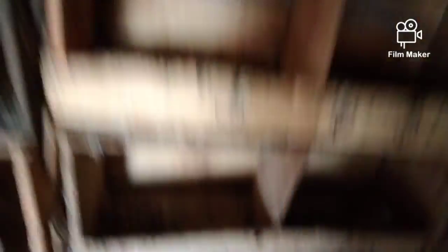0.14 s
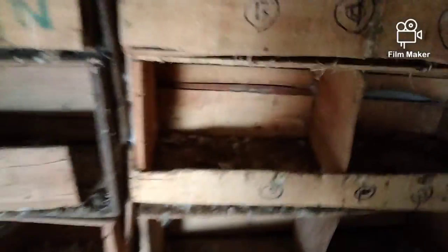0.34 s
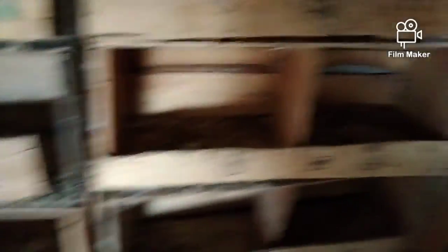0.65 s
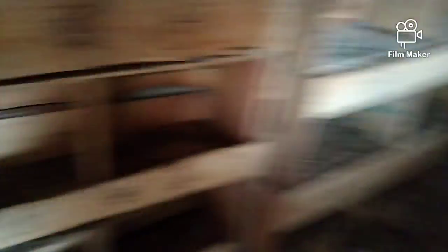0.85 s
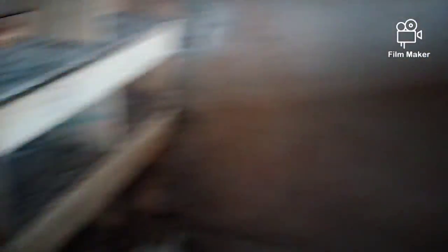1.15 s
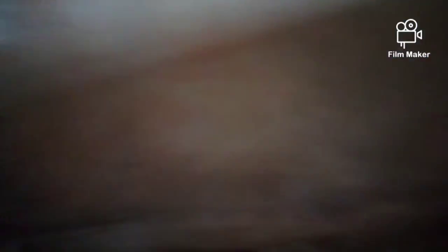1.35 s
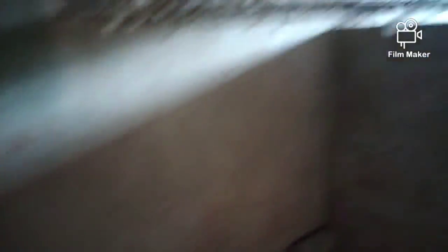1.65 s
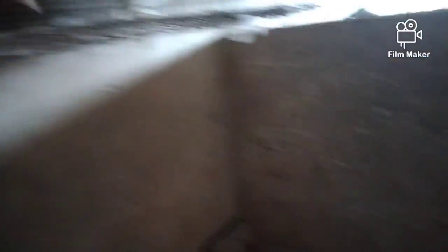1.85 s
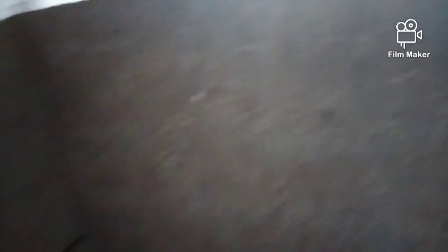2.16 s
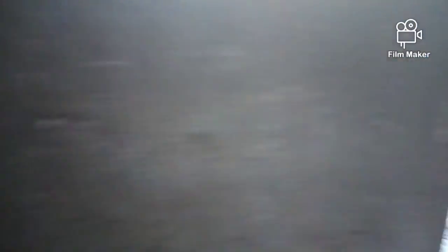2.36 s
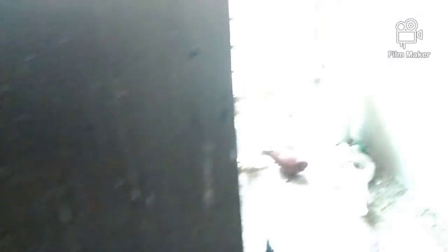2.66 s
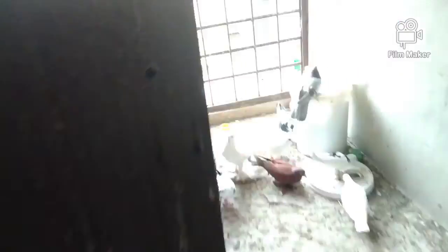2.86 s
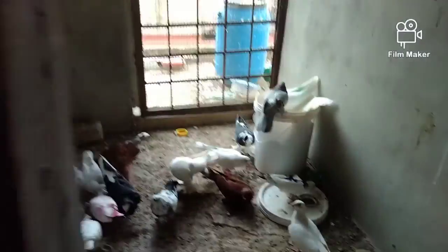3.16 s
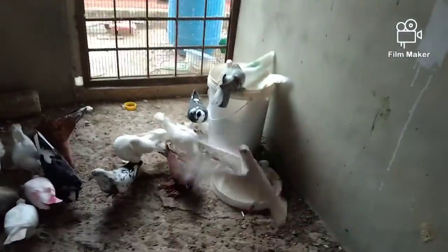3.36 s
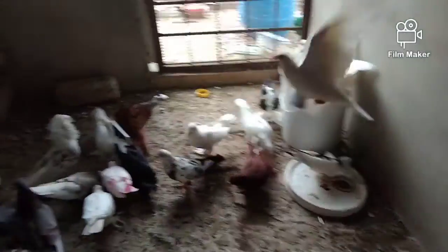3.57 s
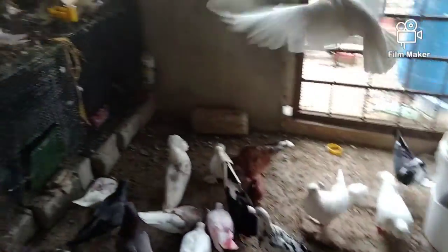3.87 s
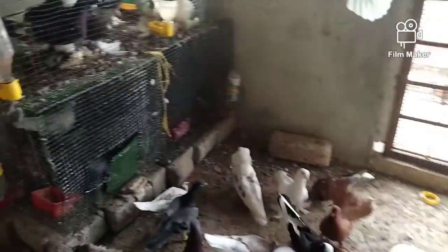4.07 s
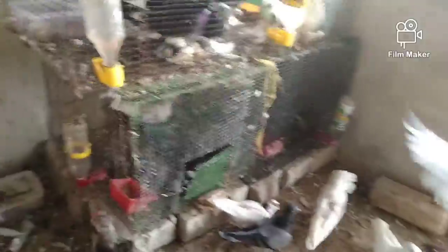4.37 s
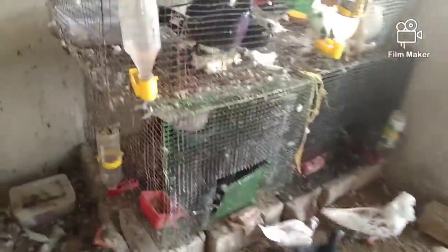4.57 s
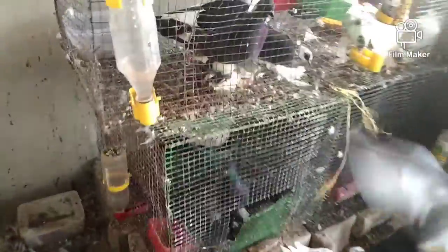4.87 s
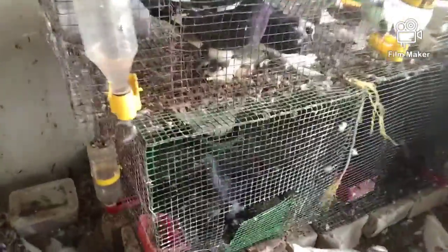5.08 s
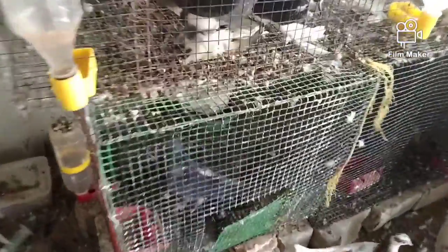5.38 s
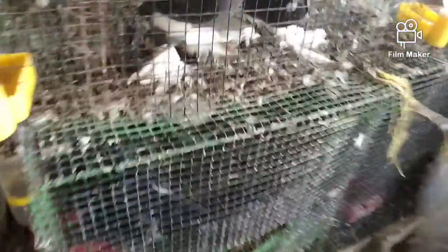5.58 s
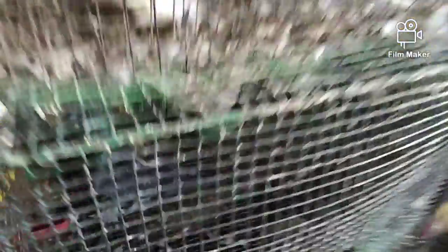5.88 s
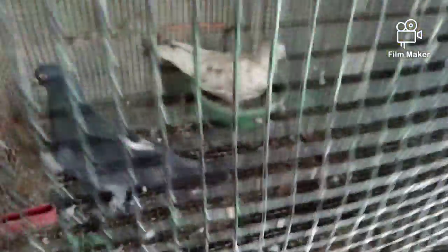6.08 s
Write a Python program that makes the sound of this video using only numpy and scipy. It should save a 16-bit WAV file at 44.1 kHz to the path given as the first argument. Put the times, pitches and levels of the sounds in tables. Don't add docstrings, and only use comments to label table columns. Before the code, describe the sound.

Quiet, muffled wing flutter comes first, with squeaky young-bird calls about a second in, a scuff of grit and a few falling whistles, plus a barely heard coo. Then the sound suddenly turns near and full: pigeons flapping hard, snapping feathers, swishing air, soft booms and dry rustling in a small concrete room. The phone's noise suppression thins the quiet parts over a faint pulsing hum.

```python
import sys
import numpy as np
from scipy import signal
from scipy.io import wavfile
from scipy.ndimage import uniform_filter1d

SR = 44100
rng = np.random.default_rng(int(sys.argv[2]) if len(sys.argv) > 2 else 0)


def wav_out(sig):
    wavfile.write(sys.argv[1], SR, np.round(np.clip(np.atleast_2d(sig).T, -1, 1) * 32767).astype(np.int16))


def decibels_to_gain(level_db):
    exponent = np.asarray(level_db, float) / 20
    return 10 ** exponent


N = 275184
CONTROL_STEP = 32
CORNER_S = 3.385

# t/s, effort level/dB, heft (0 far and thin, 1 near and full)
FLOCK = [(0, -73.5, 0.48), (.4, -71, -0.43), (.75, -67, 0.13), (1.2, -67, -0.97), (1.45, -58.5, 0.11),
         (1.72, -67, -0.6), (2.1, -59, -0.13), (2.501, -61.5, -0.098), (2.9, -65.5, -0.31),
         (3.37, -65, -0.19), (3.392, -45.5, 0.84), (3.65, -50, 0.77), (4.0, -52, 0.98), (4.2, -48.5, 0.61),
         (4.56, -47.5, 1.13), (4.8, -43, 1.01), (5.5, -43.5, 1.03), (6.24, -47.5, 1.05)]
# peak t/s, peak level/dB, heft
GUSTS = [(.54, -57.5, -.2), (1.35, -56, -0.77), (1.97, -49, 0.18), (2.05, -58, 0.38), (2.2, -46.5, 0.92),
         (2.309, -47, 0.98), (3.41, -50, .3), (3.56, -45.5, .9), (3.82, -49, 0.93), (4.24, -44, 0.93),
         (4.302, -44.5, 1.22), (4.44, -39.5, 1.08), (4.63, -40.5, 0.59), (4.86, -42, 1.14),
         (4.97, -48, 1.36), (5.3, -61, 0.47), (5.57, -41, 1.3), (5.728, -36.5, 1.24), (5.89, -41, 1.22),
         (6.001, -42, 1.12), (6.13, -45, 1)]
GUST_RISE_DB_S, GUST_FALL_DB_S = 250, 133
# level against effort/dB, loss when heft falls to 0/dB
LAYER_DB, THIN_DB = [-8.5, -2.6, 0.4, 0.2, 0.0], [17, 37.5, 14, 2.5, -1.5]
WALL_DB = [-32, -20, -3.5, 0.5, .5]


def wing_levels():
    now = control_time()
    s, db, heft = np.transpose(FLOCK)
    gust_s, gust_db, gust_heft = np.transpose(GUSTS)
    gusts = peaked(gust_s, gust_db, GUST_RISE_DB_S, GUST_FALL_DB_S)
    effort = np.vstack([np.interp(now, s, db), gusts])
    thin = 1 - np.vstack([np.interp(now, s, heft), gust_heft[:, None] + 0 * now])
    levels = []
    for offset_db, loss_db, wall_db in zip(LAYER_DB, THIN_DB, WALL_DB):
        levels.append(total_db(effort + offset_db - loss_db * thin) + wall_db * behind_wall())
    return levels


# f/Hz, density level/dB per Hz
WASH_COLOUR = [(76, -36), (130, -10), (153, -1.5), (246, -1), (503, -2.5), (672, -3), (939, -9.5),
               (1410, 0.5), (1760, -4.5), (2420, -3), (3140, 1.5), (4200, -13.5), (5460, -45), (9240, -120)]


def wash(beat):
    return airy(wing_levels()[1:], [135, 330, 950, 2200, 4100], WASH_COLOUR, beat, count=6,
                patchy_db=4.5, quiet_db=-52.5, lump_db=2.0, lump_hz=44)


# t/s, peak level/dB, centre f/Hz, snap level/dB
CLAPS = [(0.475, -43.5, 1330, -4), (1.962, -40, 2940, -17), (1.9893, -36, 2900, -15),
         (2.1759, -33, 1490, 1), (2.196, -30, 2930, -4.5), (2.309, -34.5, 3300, -16),
         (3.2178, -34, 1140, -8), (3.3911, -42, 1430, 6), (1.945, -41, 2600, -12), (3.5061, -33, 1430, -6),
         (3.8109, -32, 1950, -8), (3.8832, -33, 3320, 2), (4.6904, -26, 3250, -15), (4.9882, -28, 2400, -4),
         (5.2232, -28, 1640, -8), (5.6951, -23, 2990, -2), (5.7211, -22, 3030, -4), (6.1331, -25, 2280, 6),
         (3.5436, -10.5, 2700, -6.5), (3.6892, -31, 2030, -12), (3.7655, -32.5, 1480, 5),
         (3.908, -29, 3400, 0), (4.3144, -22, 3050, 2.5), (4.41, -26.5, 3250, -6), (4.4401, -15, 1630, -4),
         (4.572, -19, 2830, -3), (4.605, -17.5, 1410, -0.5), (4.7122, -22.5, 3270, 7.5),
         (4.738, -22.5, 1670, -4), (4.8668, -16.5, 2560, 4), (5.1039, -19, 1440, -5),
         (5.3504, -28, 3140, -10), (5.4311, -18.5, 2100, -22), (5.5528, -9, 3340, -1),
         (5.6128, -15.5, 1380, 3), (5.661, -21, 1437, 2.5), (5.7758, -9.5, 1890, -4),
         (5.8188, -17.5, 1330, -1), (6.028, -22, 1400, 8), (6.1084, -29, 3250, 8)]


def claps():
    out, t = np.zeros(N + SR), np.arange(SR // 4) / SR
    crack = t / .0014 * np.exp(1 - t / 0.0011)
    tail_shape = 0.19 * np.minimum(t / 0.0042, 1) * decibels_to_gain(-60 * t / 0.14)
    for s, peak_db, hz, snap_db in CLAPS:
        air, other = rng.standard_normal((2, len(t)))
        snap = band(air, 1230, 1550) + band(air, 2600, 3630) + band(other, 6580, 7540)
        snap += 0.32 * band(other, 10600, 16600) + 0.036 * band(other, 5200, 5700, order=1)
        push = band(other, 186, 1060) * np.minimum(t / 0.0068, 1) * np.exp(-t / 0.055)
        body = band(air, hz / 1.94, hz * 1.53)
        noise = body / body.std() + decibels_to_gain(snap_db) * snap / snap.std()
        hit = crack * noise / np.abs(crack * noise).max()
        hit += tail_shape * noise + decibels_to_gain(-16.0 + snap_db) * push / push.max()
        i = round(s * SR)
        out[i:i + len(t)] += decibels_to_gain(peak_db) * hit
    return out[:N]


# t/s, peak level/dB, f/Hz
THUMPS = [(4.294, -28, 258), (4.36, -28, 248), (4.532, -31, 231), (4.604, -26, 231), (4.845, -26, 423),
          (5.38, -30, 665), (5.483, -29, 183), (5.658, -28, 304), (5.714, -21, 210), (5.764, -22, 296),
          (5.878, -23, 315), (5.963, -27, 659), (6.118, -30, 312)]
THUMP_DB, THUMP_T60_S = -9.5, .17


def thumps():
    out, t = np.zeros(N + SR), np.arange(SR // 4) / SR
    shape = np.minimum(t / .006, 1) * decibels_to_gain(-60 * t / THUMP_T60_S)
    for s, db, hz in THUMPS:
        puff = band(rng.standard_normal(len(t)), hz / 1.3, hz * 1.3)
        i = round(s * SR)
        out[i:i + len(t)] += decibels_to_gain(db + THUMP_DB) * puff / puff.std() * shape
    return out[:N]


def boom_level():
    drone_db = -57.5 + WALL_DB[0] * behind_wall()
    return total_db(np.vstack([wing_levels()[0], drone_db]))


def boom():
    white = rng.standard_normal((2, N))
    ringing, skirt = band(white[0], 83.6, 118.0), band(white[1], 44, 110)
    x = ringing / ringing.std() + .5 * skirt / skirt.std()
    return x * decibels_to_gain(full(boom_level()))


# t/s, level/dB, settling/dB per s, mellowness/dB
STIRS = [(0, -52, 64, -3), (.15, -53.5, 57, -1.5), (0.428, -51.5, 51, -2.5), (.78, -53.5, 32, -2),
         (1.08, -51.5, 22, -5.5), (1.14, -46.5, 128, -3.5), (1.3, -57.5, 6, 2), (1.62, -58.5, 45, -4),
         (1.77, -65.5, 113, 6), (1.97, -59.5, 11, 3.5), (2.031, -55.5, 76, 0.5), (2.179, -51.5, 53, 6),
         (2.41, -58.5, 84, 3), (2.62, -60, 7, 1), (2.82, -55.5, 25, -9), (3.07, -54.5, 35, -6),
         (3.27, -47.5, 96, -10), (3.39, -50, 5, 3.5), (3.55, -47.5, 13, 1.5), (3.88, -50.5, 4, 1.5),
         (4.12, -46.5, 6, -0.5), (4.31, -39, 55, -2.5), (4.44, -42, 85, 3.5), (4.58, -41, 13, -0.5),
         (4.72, -41.5, 21, 2.5), (4.87, -40.5, 18, -0.5), (5.12, -40.5, 3, -0.5), (5.55, -36.5, 28, 2.5),
         (5.78, -39, 60, 1.5), (5.94, -38.5, 8, 0.5)]
STIR_RISE_DB_S = 693
# level at a -45 dB stir/dB, share of its swing followed, share of mellowness
RUSTLE_DB, RUSTLE_FOLLOWS, RUSTLE_MELLOW = [-57.5, -50, -45], [1.084, 0.93, 1.026], [1.36, 0.3, -0.36]
RUSTLE_FLOOR_DB = [-81, -69, -85]


def rustle_levels():
    now = control_time()
    s, db, settling, mellow = np.transpose(STIRS)
    swept = np.maximum(now - np.append(s[1:], N / SR)[:, None], 0)
    swing = peaked(s, db, STIR_RISE_DB_S, settling) - STIR_RISE_DB_S * swept + 45
    levels = []
    for ref_db, follows, share, floor_db in zip(RUSTLE_DB, RUSTLE_FOLLOWS, RUSTLE_MELLOW, RUSTLE_FLOOR_DB):
        stirred = ref_db + follows * swing + share * mellow[:, None]
        levels.append(total_db(np.vstack([stirred, floor_db + 0 * now])))
    return levels


# f/Hz, density level/dB per Hz
RUSTLE_COLOUR = [(2410, -32), (4100, -0.5), (5100, -1), (5680, 2), (6140, 10.5), (7440, 8.5), (7780, 7),
                 (8420, -9), (9520, -6), (11400, 3.5), (13000, -6.5), (14900, -9.5), (15700, 1.5)]


def rustle(beat):
    return airy(rustle_levels(), [4097, 5726, 8160, 15850], RUSTLE_COLOUR, beat, count=13,
                patchy_db=2.0, quiet_db=-33, lump_db=2.5, lump_hz=57)


def crackle():
    sizes = decibels_to_gain(4.5 * np.minimum(rng.exponential(1, N), 4)) * rng.choice([-1, 1], N)
    ticks_per_s = 300 * decibels_to_gain(5 * full(slow(8)[0]))
    ticks = sizes * (rng.random(N) < ticks_per_s / SR)
    pitches = [250, 390, 620, 900, 1350, 1600, 2300, 2900, 3400, 6300, 7300, 11200, 14500]
    dealt = rng.integers(0, 13, N)
    out = np.zeros(N)
    for k, hz in enumerate(pitches):
        ring = band(ticks * (dealt == k) + 1e-18, hz / 1.05, hz * 1.07, order=1)
        out += ring * (3000 / hz) ** 0.59
    swish_db = wing_levels()[3] - 7.0 * behind_wall()
    return out / out.std() * decibels_to_gain(full(swish_db) - 7.5)


# t/s, level/dB, settling/dB per s
SCUFFS = [
    (1.97, -60, 60),
    (2.035, -57, 90),
    (2.18, -52, 100),
    (2.3, -58, 60),
]


def scuff():
    s, db, settling = np.transpose(SCUFFS)
    hiss = band(rng.standard_normal(N), 4000, 15700)
    level = total_db(peaked(s, db, 500, settling)) + 1.5 * slow(30)[0]
    return hiss / hiss.std() * decibels_to_gain(full(level))


# t/s, length/s, from f/Hz, to f/Hz, level/dB
SQUEALS = [(.845, .095, 4450, 3730, -53), (.94, .08, 3720, 3780, -54), (1.01, .12, 4190, 4140, -49),
           (1.015, .095, 3770, 3640, -46), (1.1, .125, 3530, 3420, -46), (1.13, .12, 4230, 4190, -51),
           (1.225, .125, 3630, 3520, -45), (1.24, .11, 3450, 3280, -54), (1.25, .06, 3030, 2400, -56),
           (1.25, .1, 4050, 4130, -52), (1.3, .185, 2370, 2060, -51), (1.37, .055, 3420, 3260, -42),
           (1.37, .11, 4230, 4060, -51), (1.42, .09, 3170, 3130, -52), (1.45, .1, 3480, 3400, -51),
           (1.515, .095, 3110, 3020, -44), (1.52, .085, 3990, 3810, -57)]
SQUEAL_DB, SLIDE_CURVE = -2.5, .75
SWELL_S, SWELL_DB, WARBLE_HZ, WARBLE_PER_S = 0.021, -7, 30, 18.5


def squeal():
    out = np.zeros(N)
    for s, length, from_hz, to_hz, db in SQUEALS:
        t = np.linspace(0, length, num=24)
        warble = WARBLE_HZ * np.sin(2 * np.pi * (WARBLE_PER_S * t + rng.random()))
        pitch = from_hz + (to_hz - from_hz) * (t / length) ** SLIDE_CURVE + warble
        swell = np.clip(1 - np.minimum(t, length - t) / SWELL_S, 0, 1)
        add(out, s + t, pitch, db + SQUEAL_DB + SWELL_DB * swell, rough=0.98, rough_hz=44.8)
    return out + decibels_to_gain(35) * band(out ** 2, 6000, 9000)


# t/s, from f/Hz, to f/Hz, level/dB, held/s
WHISTLES = [(0, 3490, 3160, -48.5, .03), (0, 4250, 4180, -54.5, .04), (0.185, 2800, 2720, -55, .05),
            (0.343, 3900, 2800, -49, .035), (0.383, 1950, 1620, -56, .03), (0.473, 1322, 1196, -41, .03),
            (0.57, 4000, 2790, -48, .035), (0.618, 2050, 1888, -58, .04), (1.105, 1730, 1710, -58, .055),
            (2.306, 3370, 3410, -43, .025), (2.477, 3670, 3010, -52, .03), (2.51, 2400, 2280, -49, .03),
            (2.515, 4700, 4560, -67.5, .04), (2.53, 1679, 1430, -42, .045), (2.658, 3630, 2960, -49, .03),
            (2.855, 3630, 2890, -48, .045), (2.888, 1850, 1430, -45, .05), (3.101, 1926, 1350, -49, .035),
            (3.149, 3840, 3680, -58, .04), (3.915, 3120, 2306, -44.5, .025), (4.125, 3000, 2200, -48, .025),
            (4.625, 2300, 2130, -40, .02), (5.078, 3040, 2800, -37, .02), (5.288, 2450, 2330, -37, .014),
            (5.32, 2360, 2330, -42, .02), (5.38, 2240, 2136, -38, .016), (4.41, 3314, 3200, -39, .016),
            (5.518, 3430, 2850, -35, .012), (5.265, 3480, 3280, -37, .012), (4.345, 1450, 1410, -43, .025),
            (4.44, 2400, 2250, -38, .02), (4.65, 1700, 1620, -41, .012), (5.548, 3600, 3350, -29, .02),
            (5.71, 3200, 3050, -36, .012), (5.77, 3300, 3120, -29, .01), (5.77, 1500, 1400, -32, .01),
            (2.69, 1750, 1680, -60, .04)]
GLIDE_S, GLIDE_HZ_PER_S = 0.008, 29000


def whistles():
    out = np.zeros(N)
    for s, from_hz, to_hz, db, hold in WHISTLES:
        glide = GLIDE_S + abs(from_hz - to_hz) / GLIDE_HZ_PER_S
        times = s + np.array([0, 0.35 * glide, .8 * glide, glide, glide + hold, glide + 1.9 * hold])
        pitch = to_hz + (from_hz - to_hz) * np.array([1.01, 0.85, .15, 0.03, -.03, -.06])
        level = db + np.array([-9.0, -10.0, -5.0, 3.0, -7.5, -18.0])
        add(out, times, pitch, level, rough=0.9, rough_hz=100)
    return out


# t/s, level/dB, centre f/Hz, width/octaves, T60/s
FLAPS = [(0, -54.5, 1410, 0.47, 0.21), (0, -63, 605, 0.95, .3), (0, -65, 95, 0.63, 1.4),
         (.2, -62, 600, 1.3, 0.5), (3.27, -61.5, 200, 2.4, 0.72), (3.071, -65, 265, 0.41, .4),
         (0.169, -64, 228, 0.63, 0.5), (4.21, -36.5, 706, 0.38, 0.55), (0, -45, 3450, 0.39, 0.27),
         (0.885, -41.5, 11500, 0.23, .2), (.175, -62, 1700, 0.95, 0.39), (0.801, -47, 1000, 1.8, 0.5),
         (.803, -47, 1410, .2, .25), (.803, -48, 1050, .25, .2), (1.14, -56, 800, .3, .25),
         (1.26, -66, 200, .4, .3), (1.61, -66, 290, .3, .2), (.41, -64, 190, .4, .3),
         (1.135, -50, 870, 1.56, 0.33), (1.256, -47, 1840, 1.8, 0.42), (1.37, -59.5, 520, 0.98, 0.72),
         (1.79, -49, 860, 2.1, 0.72), (2.095, -45, 1220, 1.05, 0.35), (.365, -56, 3300, .45, .4),
         (.59, -56, 3300, .45, .4), (.39, -58, 2100, .5, .5), (1.9, -53, 2400, 1.3, .5),
         (2.25, -48, 1100, .8, .3), (2.433, -45, 1040, 0.6, 0.25), (2.535, -59, 129, 0.79, 0.13),
         (2.755, -57, 204, 0.47, 0.29), (3.22, -39.5, 1220, 1.3, 0.28), (3.55, -36, 192, 0.31, 0.48)]


def flaps():
    out, t = np.zeros(N + SR), np.arange(SR // 2) / SR
    for s, db, hz, octaves, t60 in FLAPS:
        half = 2 ** (octaves / 2)
        puff = band(rng.standard_normal(len(t)), hz / half, hz * half, order=3)
        shape = np.minimum(t / 0.0048, 1) * decibels_to_gain(-60 * t / t60)
        i = round(s * SR)
        out[i:i + len(t)] += decibels_to_gain(db) * puff / puff.std() * shape
    return out[:N]


# t/s, f/Hz, level/dB
COO = [
    [(0.45, 609, -90), (0.55, 550, -68), (0.62, 570, -85)],
    [(2.7, 600, -90), (2.715, 610, -70), (2.77, 590, -84), (2.8, 620, -71), (2.86, 600, -92),
     (2.95, 540, -82), (3.08, 600, -70), (3.11, 570, -82), (3.2, 512, -87)],
]


def coo():
    out = np.zeros(N)
    for hum in COO:
        add(out, *np.transpose(hum), rough=1.8, rough_hz=70.0)
    return out


def loft(x):
    t = np.arange(SR // 2) / SR
    tail = rng.standard_normal(len(t)) * decibels_to_gain(-60 * t / 0.25) * (t > .004)
    return x + decibels_to_gain(-4.0) * signal.fftconvolve(x, tail / np.sqrt(np.sum(tail ** 2)))[:N]


THROB_S, THROB_FIRST_S, THROB_DB = .215, .2, 6.5


def residue():
    white = rng.standard_normal((2, N))
    pulse = np.cos(2 * np.pi * (np.arange(N) / SR - THROB_FIRST_S) / THROB_S)
    throb = decibels_to_gain(THROB_DB * pulse + full(slow(6.1)[0])) * band(white[1], 172, 213)
    return decibels_to_gain(-68.5) * band(white[0], 25, 310, order=1) + decibels_to_gain(-59.5) * throb


def airy(levels, splits, colour, beat, count, patchy_db, quiet_db, lump_db, lump_hz):
    hz, db = np.transpose(colour)
    white, lumps = rng.standard_normal((2, N)), slow(lump_hz, rows=len(levels))
    out = np.zeros(N)
    for k, level in enumerate(levels):
        edges = np.geomspace(splits[k], splits[k + 1], count + 1)
        faint = np.clip((quiet_db - level) / 20, 0, 1)
        shape = decibels_to_gain(np.interp(np.log(edges[1:] * edges[:-1]) / 2, np.log(hz), db))
        shape /= np.sqrt(np.sum(shape ** 2 * np.diff(edges)) * 2 / SR)
        gust_db = level + lump_db * (0.8 * beat + 0.5 * lumps[k])
        for j, patch in enumerate(slow(14, rows=count)):
            gain = shape[j] * decibels_to_gain(gust_db + (2.4 + patchy_db * faint) * patch)
            out += full(gain) * band(white[j % 2], edges[j], edges[j + 1], order=3)
    return out


def add(out, s, hz, db, rough, rough_hz):
    i = round(s[0] * SR)
    t = np.arange(i, round(s[-1] * SR)) / SR
    white = rng.standard_normal((2, len(t) + 4000))
    shake = signal.sosfilt(signal.butter(2, rough_hz, fs=SR, output="sos"), white[0] + 1j * white[1])
    shake = 1 + rough * (shake / shake.std())[2000:2000 + len(t)]
    turn = np.exp(2j * np.pi * np.cumsum(np.interp(t, s, hz)) / SR)
    fade = np.clip(np.minimum(t - s[0], s[-1] - t) / 0.00079, 0, 1)
    out[i:i + len(t)] += np.sqrt(2) * fade * decibels_to_gain(np.interp(t, s, db)) * np.imag(shake * turn)


def strokes(per_s, fade_s):
    count = N // CONTROL_STEP + 2
    starts = rng.exponential(1, count) * (rng.random(count) < per_s * CONTROL_STEP / SR)
    sinking = signal.lfilter([1], [1, -np.exp(-CONTROL_STEP / SR / fade_s)], starts)
    x = np.log(0.091 + sinking)
    return (x - x.mean()) / x.std()


def slow(rate_hz, rows=1):
    r = np.exp(-2 * CONTROL_STEP * np.pi * rate_hz / SR)
    white = rng.standard_normal((rows, N // CONTROL_STEP + 802))
    x = signal.lfilter([1], [1, -2 * r, r * r], white)[:, 800:]
    return x / x.std(axis=1, keepdims=True)


def control_time():
    return np.arange(N // CONTROL_STEP + 2) * CONTROL_STEP / SR


def behind_wall():
    return control_time() < CORNER_S


def full(x):
    return np.interp(np.arange(N) / CONTROL_STEP, np.arange(len(x)), x)


def peaked(s, db, rise_db_s, fall_db_s):
    since = control_time() - s[:, None]
    fall = np.reshape(fall_db_s, (-1, 1)) * since
    return db[:, None] + np.where(since < 0, rise_db_s * since, -fall)


def total_db(rows_db):
    return 10 * np.log10(np.sum(decibels_to_gain(2 * rows_db), axis=0) + 1e-30)


def band(x, low_hz, high_hz, order=2):
    edges = [low_hz, min(high_hz, .45 * SR)]
    return signal.sosfilt(signal.butter(order, edges, "band", fs=SR, output="sos"), x)


def scene():
    beat = strokes(per_s=30, fade_s=0.013)
    wings = wash(beat) + claps() + thumps() + boom()
    litter = rustle(beat) + crackle() + scuff()
    calls = loft(squeal() + whistles() + coo())
    return (wings + litter + calls + flaps())[None]


GATE_DB, GATE_DEPTH_DB, GATE_S = -54.5, -18, .035


def gate(x):
    _, _, z = signal.stft(x, nperseg=768, noverlap=576)
    keep = np.exp(-192 / SR / GATE_S)
    power = signal.lfilter([1 - keep], [1, -keep], uniform_filter1d(np.abs(z) ** 2, size=3, axis=1))
    gain = np.maximum(1 - decibels_to_gain(2 * (GATE_DB - 33.5)) / (power + 1e-20), decibels_to_gain(GATE_DEPTH_DB))
    return signal.istft(z * gain, nperseg=768, noverlap=576)[1][:, :N]


def top_cut(x):
    return signal.sosfilt(signal.butter(12, 16870, fs=SR, output="sos"), x)


def record(dry):
    x = signal.sosfilt(signal.butter(2, 50, "high", fs=SR, output="sos"), gate(dry)) + residue()
    top = signal.sosfilt(signal.ellip(10, .5, 50, 15660, fs=SR, output="sos"), x)
    return top_cut(top + decibels_to_gain(-66) * x)


dry = scene()
out = record(dry)
wav_out(out)
```